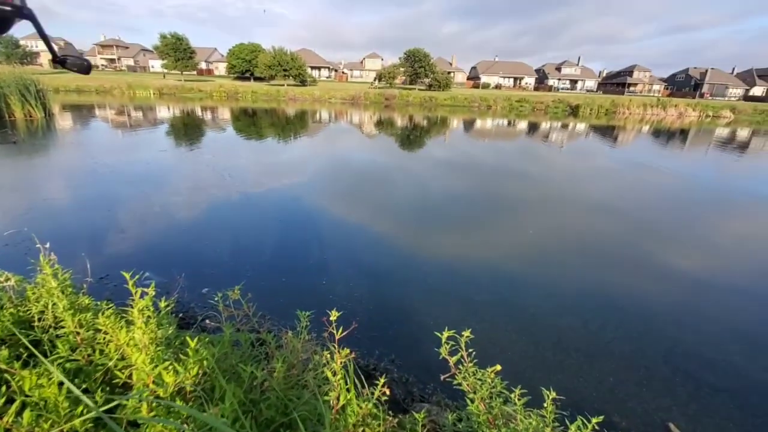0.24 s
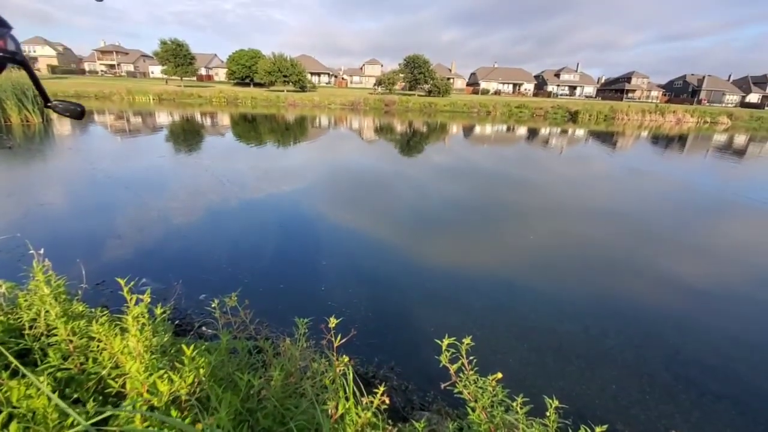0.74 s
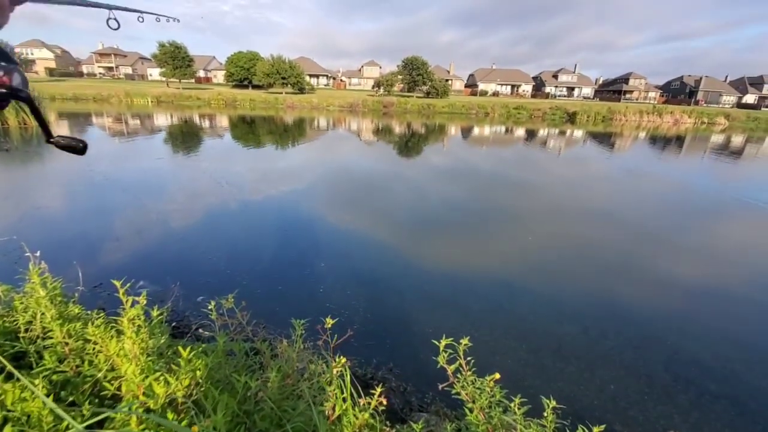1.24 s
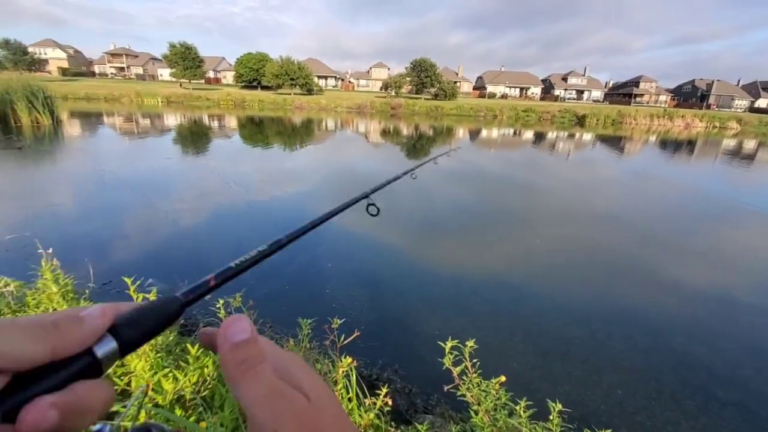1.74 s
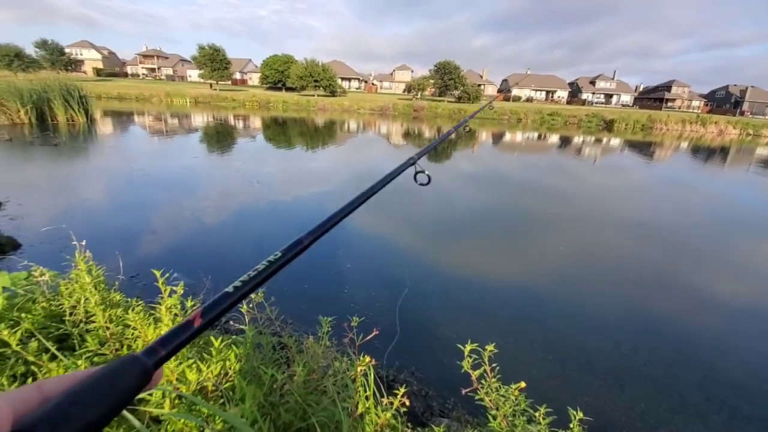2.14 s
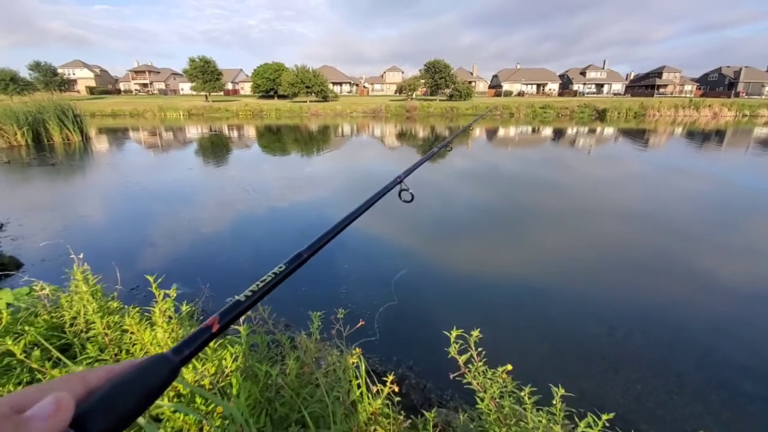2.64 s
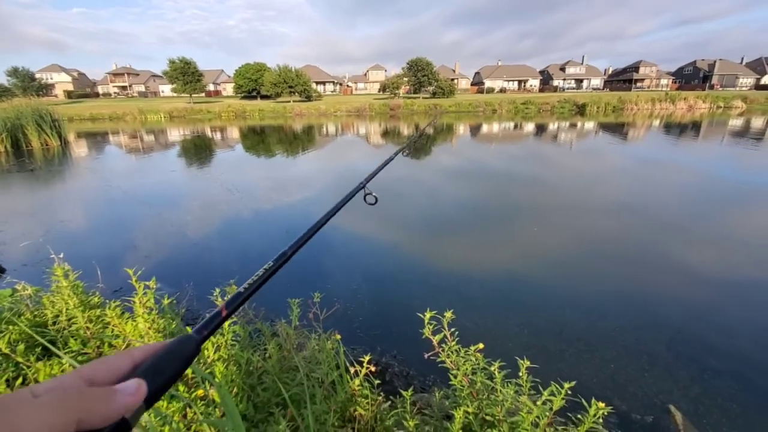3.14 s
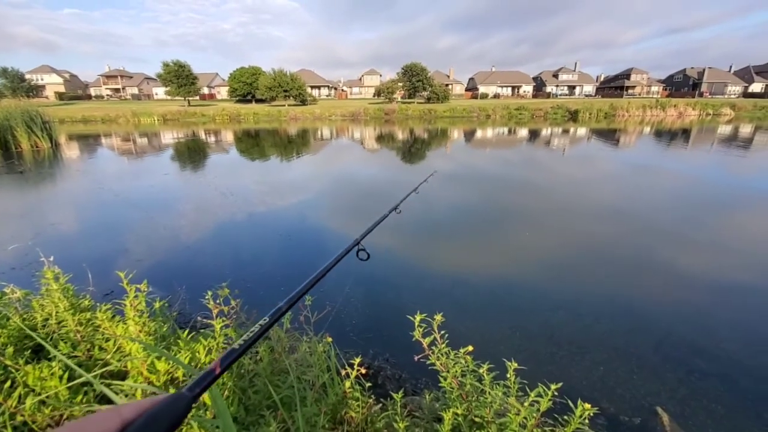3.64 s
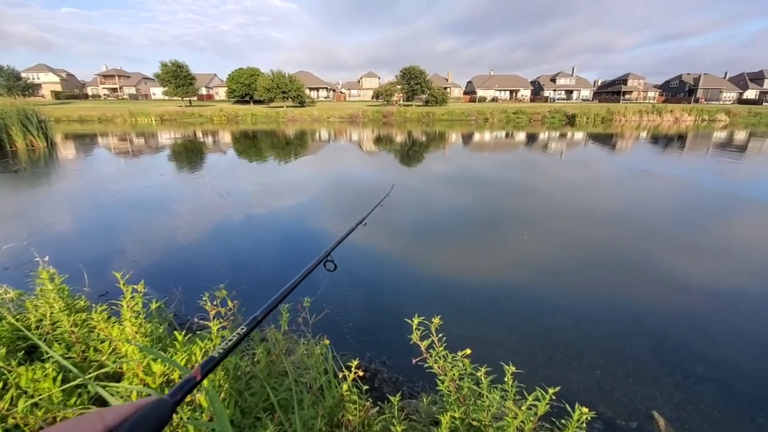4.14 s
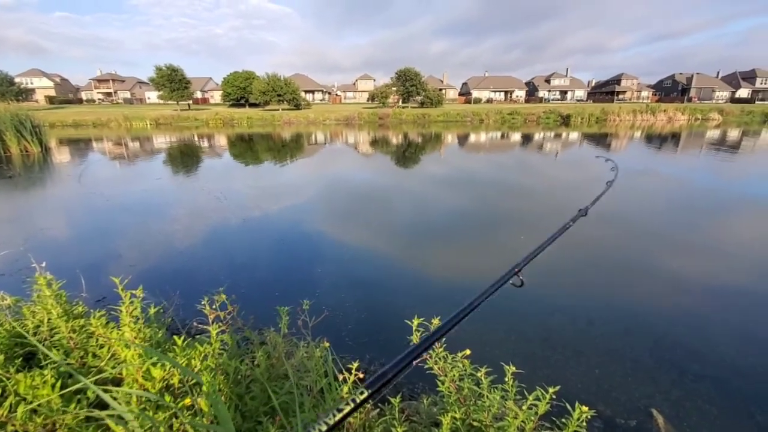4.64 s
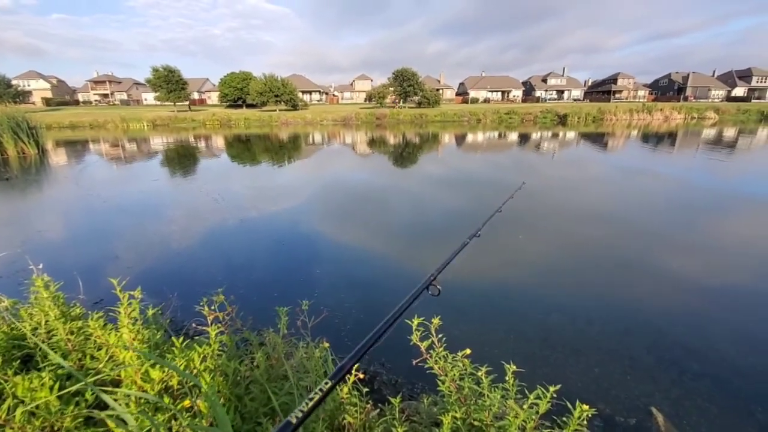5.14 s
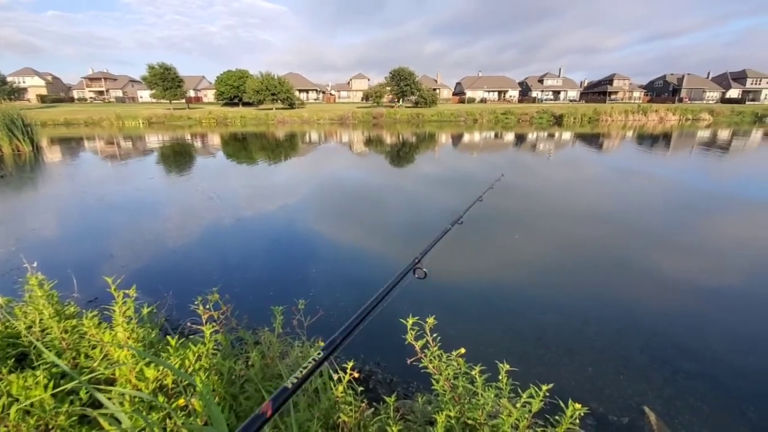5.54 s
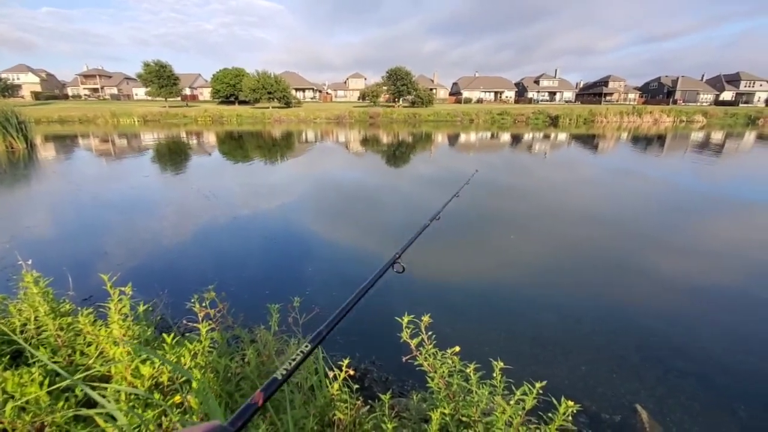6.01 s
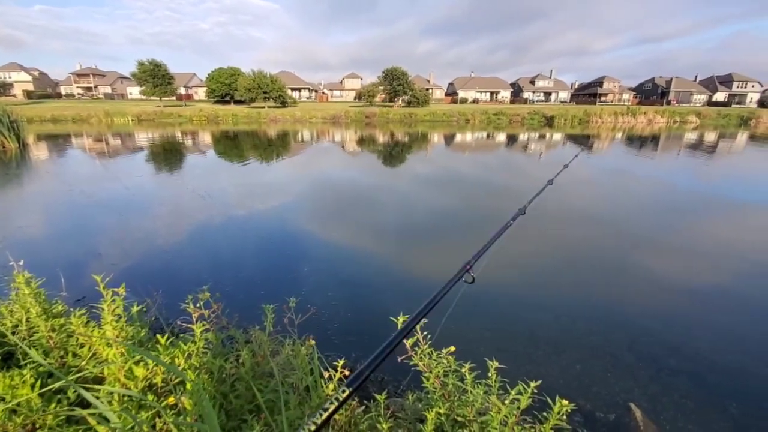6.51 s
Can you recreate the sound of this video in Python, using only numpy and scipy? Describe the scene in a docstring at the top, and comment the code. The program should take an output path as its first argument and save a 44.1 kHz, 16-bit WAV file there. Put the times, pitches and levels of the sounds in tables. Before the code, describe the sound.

A quiet pond bank in open air, heard through a close stereo microphone with faint steady hiss. Crickets shimmer continuously around 6 kHz, slightly stronger at first, over low distant road rumble; a far engine swells gently around 1.5 s. A small far bird sings thin, gliding whistles near 4 kHz, in short phrases starting around 0, 0.9, 2, 2.8, 3.7, 4.7, 5.5 and 6.3 s, fainter toward the end. Tiny reel rattles and a light tick at 1.5 s precede one loud, dry metallic snap at 2.04 s, with a woody-hard knock and very brief wire chatter. The whole background then dips and slowly creeps back. Soft low breeze buffets at 2.2-3 s. Fine bright clicks come at 2.75 and 2.93 s. From 3 s, soft rubbing and a grainy reel whirr, strongest near 3.5 s, continue faintly with small knocks, clearest at 4.85 s, until the end at 6.8 s.

```python
"""A pond bank on a nearly still day: crickets trill in the weeds, a small bird whistles far off, traffic rumbles.
Close by, an angler handles a spinning reel: one sharp snap, a few light clicks, then a soft whirr of winding.
Crickets and bird are gliding tones; traffic, breeze, hiss, whirr and rubbing are shaped noise, engines wavering sines.
Metal contacts are decaying noise bursts with a resonant peak, and knocks are damped modes of the reel body.
Loud peaks make an automatic gain control turn the whole scene down for a while."""
import sys
import numpy as np
from scipy import signal
from scipy.fft import rfft, irfft, next_fast_len
from scipy.io import wavfile
from scipy.ndimage import uniform_filter1d, map_coordinates

SR = 44100
rng = np.random.default_rng(int(sys.argv[2]) if len(sys.argv) > 2 else 0)


def persist_wave(psi):
    """Save psi, clipped to +-1, as 16-bit WAV."""
    counts = np.round(np.clip(psi, -1, 1) * 32767).astype(np.int16)
    wavfile.write(sys.argv[1], SR, np.atleast_2d(counts).T)


N = 298680
TIME = np.arange(N) / SR

# hiss spectrum: pitch_hz, density_db (relative, per Hz)
HISS_SPECTRUM = [(500, 13), (1100, 17.5), (1500, 19), (2000, 19), (2500, 21.5), (3100, 15.5), (4500, 3),
                 (7400, 11), (8600, -1.5), (9800, 6.5), (12000, -4.5), (14200, -8), (16000, -9)]
# left-right likeness of the hiss: pitch_hz, coherence
HISS_COHERENCE = [(1500, 1.0), (3000, 1.0), (5000, 0.7), (8500, 0.4), (12000, 0.13)]
HISS_DB = -51

# puffs of breeze on the microphone ports, before buffeting: peak_s, length_s, level_db
BREEZE_PUFFS = [(2.25, 0.44, -42.5), (2.72, 0.97, -44.5), (4.7, 0.99, -53)]
# breeze spectrum: pitch_hz, density_db (relative, per Hz)
BREEZE_SPECTRUM = [(15, -22), (40, -4.5), (75, -6.5), (130, -14), (300, -47), (900, -90)]
BREEZE_REST_DB = -65.5

# far roads over time: time_s, rumble_db, wash_db (before a fixed lift and drift)
TRAFFIC_LEVELS = [(0, -45, -53), (.7, -43.5, -54.5), (1.6, -43.5, -54), (2.6, -45, -53), (3.4, -45, -53),
                  (4.4, -44.5, -53.5), (5.4, -45, -52), (6.77, -44.5, -54.5)]
# steady engine notes: pitch_hz, level_db (relative; lowered together)
ENGINE_DRONES = [(75, -51.5), (141, -54.5), (391, -68)]
# one far engine swelling past: peak_s, length_s, level_db
ENGINE_SWELL = [(1.55, 1.7, -49)]
ENGINE_IDLE_HZ, ENGINE_RISE_HZ, ENGINE_REV_S, ENGINE_IDLE_DB = 141.6, 33.9, 2.7, -60
# road rumble spectrum: pitch_hz, density_db (relative, per Hz)
RUMBLE_SPECTRUM = [(15, -5), (28, -16), (42, -5), (75, 1.5), (120, -0.5), (170, -1.5), (250, -9.5),
                   (400, -36), (900, -60)]
# tyre wash spectrum: pitch_hz, density_db (relative, per Hz)
WASH_SPECTRUM = [(120, -1.5), (280, 2), (420, 2), (700, -2), (1100, -9), (1500, -6.5), (2500, -32),
                 (4000, -18.5), (8000, -43)]
# left-right likeness of far sound: pitch_hz, coherence
FAR_COHERENCE = [(40, 0.91), (130, 0.89), (260, 0.91), (480, 0.65), (750, 0.19), (1200, 0.42), (15000, 1)]

# singing levels of the cricket groups: time_s, high_pitched_db, low_pitched_db
SWARM_LEVELS = [(0, -44, -51), (.8, -43, -51.5), (1.6, -48, -49), (2.3, -48, -56), (3.1, -50, -51),
                (3.85, -47, -50.5), (4.3, -48.5, -49), (5.2, -49.5, -46.5), (6.77, -50.5, -47)]
# near crickets: carrier_hz, stroke_rate_hz, level_db (relative to their group), balance_db (left minus right)
NEAR_CRICKETS = [(6510, 51.8, -1.2, -2.5), (6270, 53, -3.5, -5), (6420, 83.5, -11, -3)]
# distant chorus and its octave: pitch_hz, density_db (relative, per Hz)
CHORUS_SPECTRUM = [(4800, -76), (5550, -19), (5950, -11.5), (6200, 0), (6580, 4.5), (6800, -3), (7000, -40),
                   (7800, -80), (11500, -26.5), (12300, -23), (12850, -13), (13350, -20.5), (13900, -24),
                   (15000, -56)]

# bird's notes, in phrases drawn from chip, rising whistle, arch and falling close:
# peak_s, rise_s, fall_s, start_hz, peak_hz, end_hz, level_db (relative)
BIRD_NOTES = [(.063, .018, .032, 4250, 4600, 4200, -53), (.205, .115, .04, 4090, 4320, 4260, -56),
              (.282, .03, .045, 4270, 4650, 4220, -52), (.33, .02, .05, 4190, 4130, 3980, -55),
              (.395, .035, .07, 3990, 3890, 3730, -55), (.9, .015, .036, 4350, 4700, 4120, -46),
              (1.035, .09, .035, 4120, 4290, 4120, -51.5), (1.112, .04, .062, 4030, 4490, 4080, -53.5),
              (1.245, .055, .065, 4030, 3870, 3740, -53.5), (1.982, .016, .03, 4350, 4640, 4250, -56),
              (2.17, .09, .02, 4170, 4280, 4260, -63), (2.217, .035, .05, 4300, 4460, 4170, -53),
              (2.285, .035, .07, 4140, 4030, 3810, -55.5), (2.808, .014, .034, 4400, 4570, 4150, -49),
              (2.96, .09, .04, 4080, 4190, 4130, -59), (3.035, .022, .03, 4280, 4420, 4200, -50.5),
              (3.095, .05, .055, 4170, 4090, 3850, -53), (3.745, .017, .034, 4280, 4480, 3980, -49.5),
              (3.91, .105, .035, 4000, 4140, 4140, -53.5), (3.98, .032, .03, 3980, 4380, 4300, -57),
              (4.022, .022, .042, 4310, 4180, 3970, -52), (4.656, .017, .036, 4280, 4610, 3980, -46.5),
              (4.803, .105, .035, 4020, 4260, 4080, -52), (4.878, .03, .048, 4220, 4420, 4220, -49.5),
              (5.503, .016, .036, 4280, 4440, 3980, -57), (5.62, .07, .03, 4040, 4090, 4080, -63),
              (5.704, .018, .032, 4280, 4400, 4170, -60), (5.75, .02, .06, 4220, 4180, 4020, -63),
              (6.318, .018, .034, 4250, 4440, 4080, -60), (6.49, .015, .04, 4420, 4520, 4250, -60.5),
              (6.565, .045, .09, 4260, 4130, 4020, -60)]
BIRD_TRIM_DB, BIRD_ECHO_DB = -1, -12
# share of a note over which its pitch turn is rounded; flutter of level and of pitch
NOTE_ROUNDING, FLUTTER_DB, FLUTTER_HZ = .25, 2.2, 22

# strokes of hand and line on the rod: peak_s, length_s, level_db
ROD_STROKES = [(1.45, 1.1, -74), (2.66, 0.43, -66.5), (2.88, 0.098, -68), (3.5, 1.5, -61),
               (4.4, 0.7, -61.5), (6.5, 1.7, -66)]
# rubbing spectrum: pitch_hz, density_db (relative, per Hz)
RUBBING_SPECTRUM = [(800, -16), (2000, -9), (4000, 5.0), (7000, 0), (10000, 1.5), (15000, -6.0)]

# turns of the reel handle: peak_s, length_s, level_db
HANDLE_TURNS = [(3.05, .5, -54.5), (3.5, 0.71, -47), (3.8, 0.59, -50.5), (4.5, 0.33, -55), (5.3, 2.7, -59),
                (6.1, 0.94, -54.5), (6.7, 0.29, -57)]
# gear whirr spectrum: pitch_hz, density_db (relative, per Hz)
WHIRR_SPECTRUM = [(600, -12.5), (1300, -8), (1750, -3.5), (2030, 6.5), (2250, -5), (3000, -24), (6000, -47)]
WINDING_REST_DB = -63.5

# sprung wire rattling after it snaps shut: peak_s, length_s, level_db
WIRE_CHATTER = [(2.05, 0.014, -27.5), (2.061, 0.034, -35)]
# wire chatter spectrum: pitch_hz, density_db (relative, per Hz)
CHATTER_SPECTRUM = [(300, -14), (480, 8.5), (620, -1), (850, 6.5), (1050, 4), (1280, 7), (1800, 4),
                    (2300, -14), (3000, -7), (5500, -12), (7000, -18), (8200, -20), (9800, -6),
                    (11300, -13), (15500, -17)]

# metal parts of the reel catching and seating; levels precede the spectral shaping:
# start_s, tick_db, tick_hz, tick_t60_s, knock_db, body_hz, balance_db (left minus right)
METAL_CONTACTS = [(1.457, -42, 3700, 0.0082, -42, 1800, 7), (2.0276, -36, 10000, .01, -35, 1800, -10),
                  (2.0308, -19.5, 11100, 0.0041, -46, 1800, 1), (2.031, -35, 4800, .012, -47, 1800, -8),
                  (2.034, -48, 4900, .008, -27, 1850, -4), (2.041, -29, 11300, .012, -43, 1800, -4),
                  (2.0431, -28, 11000, 0.011, -26, 1690, 6), (2.0442, -22, 10400, .006, -2, 1824, -4.5),
                  (2.0491, -33, 6500, 0.011, -23, 1167, -4), (2.051, -37, 9800, .012, -24, 1860, 4),
                  (2.0555, -42, 9800, .01, -23, 1930, -5), (2.077, -36, 5500, .005, -54, 1800, -3),
                  (2.7282, -37, 5400, 0.012, -47, 1790, -6), (2.7305, -49, 5400, .012, -41, 1820, -5),
                  (2.737, -26.5, 6740, 0.008, -40, 1780, -9), (2.7396, -35.5, 7500, 0.013, -39, 1740, 1),
                  (2.743, -47, 4000, 0.012, -39, 1730, 2), (2.75, -40, 10500, .012, -46, 1750, -6),
                  (2.7512, -29, 5360, 0.0087, -31, 1740, -2), (2.7533, -37, 8500, 0.0099, -46, 1700, -2),
                  (2.7768, -39.5, 3700, 0.0067, -48, 1800, -2), (2.9318, -36.5, 5440, 0.014, -48, 1800, -3),
                  (2.9346, -36, 6460, .007, -46, 1780, -9), (2.94, -36, 4700, 0.0088, -28, 1950, -6),
                  (4.4588, -50, 11000, 0.0092, -34.5, 1800, 0)]
# play in the handle knocking the body alone: start_s, knock_db (before spectral balance)
HANDLE_KNOCKS = [(0.34, -38.5), (1.038, -39), (1.6486, -33.5), (1.7355, -37), (3.456, -35), (3.956, -33.5),
                 (4.844, -27.5), (5.747, -32.5), (6.322, -33.5)]
# modes of reel body and rod at the main strike place: pitch_hz, level_db (relative), t60_s
BODY_MODES = [(1871, 11, 0.0071), (2120, -21, 0.0038), (1673, -5, 0.0088), (1320, -20.5, 0.021),
              (854, -26.5, 0.029), (466, -36.5, 0.03)]
# frequency balance of the knocks, deep part right and high part left: pitch_hz, balance_db (left minus right)
KNOCK_BALANCE = [(450, -15), (1300, 3), (1750, -3), (2150, 13), (3000, 1)]
# filter on the metal ticks: pitch_hz, gain_db
TICK_RESPONSE = [(300, -8), (900, 16), (1700, 14), (3000, 3), (5000, 1), (6800, 2), (8200, -6),
                 (10500, -3.5), (13000, 4), (16000, 2)]
# filter on the knocks' return from the bank: pitch_hz, gain_db
BANK_RESPONSE = [(350, 1), (850, -16), (1300, -4.5), (1900, -21.5), (2600, 9.5)]
# lowest level of the random rattles and the range above it
RATTLE_DB, RATTLE_RANGE_DB = -46, 7
# low-pass corner of the body; rise, sharpness and gain of the struck part's ring
BODY_TOP_HZ, TICK_RISE_S, PART_Q, PART_GAIN = 2220, 0.0013, 4.9, 9.5

# gain control: threshold, dB cut per dB above it, recovery rate, reaction time
AGC_DB, AGC_SLOPE, AGC_DB_PER_S, AGC_LAG_S = -13, 0.19, 4.5, 0.048
TOP_HZ = 15800  # band limit of the output


def amp(db):
    """Logarithmic level: 20 dB is a tenfold change of amplitude."""
    return 10 ** (np.asarray(db) / 20)


def unit(x):
    """Normalisation: root-mean-square amplitude becomes 1."""
    return x / np.sqrt(np.mean(x ** 2) + 1e-20)


def along(points, hz):
    """Interpolation of (Hz, value) points along a logarithmic frequency axis."""
    f, v = np.transpose(points)
    return np.interp(np.log(hz + 1), np.log(f + 1), v)


def curves(rows):
    """Linear interpolation in time of each column after the first."""
    s, *cols = np.transpose(rows)
    return [np.interp(TIME, s, c) for c in cols]


def wobble(rate):
    """Slow random modulation: a smooth curve through rate random knots a second."""
    knots = rng.standard_normal(int(N * rate / SR) + 4)
    return map_coordinates(knots, [TIME * rate])


def turns(hz):
    """Phase is the time integral of frequency."""
    return 2 * np.pi * np.cumsum(hz) / SR


def filtered(x, response):
    """Linear filtering: the spectrum is multiplied by a frequency response."""
    size = next_fast_len(N + SR // 2)
    spectrum = rfft(x, size) * response(np.fft.rfftfreq(size, 1 / SR))
    return irfft(spectrum, size)[..., :N]


def panned(pan_db):
    """Interaural level difference: left and right gains share pan_db between them."""
    return amp([[pan_db / 2], [-pan_db / 2]])


def spaced(x, lead_ms):
    """Interaural time difference: sound reaches the left microphone lead_ms before the right."""
    sides = np.array([[1], [-1]])
    return filtered(x, lambda hz: np.exp(np.pi * 1j * hz * lead_ms / 10 ** 3 * sides))


def add(track, s, sound):
    """Superposition: a sound is summed into a track at time s."""
    part = track[..., max(round(s * SR), 0):][..., :sound.shape[-1]]
    part += sound[..., :part.shape[-1]]


def swells(rows, rest_db=-120):
    """Power addition: cosine arches (peak s, length s, dB) over a resting level, returned as gain."""
    power = amp(rest_db) ** 2
    for s, length, db in rows:
        arch = np.cos(np.pi * np.clip((TIME - s) / length, -.5, .5))
        power = power + (amp(db) * arch) ** 2
    return np.sqrt(power)


def rush(spectrum, alike):
    """Partial coherence: independent mid and side noise mix to a set left-right likeness, rms 1."""
    def response(hz):
        angle = np.arccos(np.clip(along(alike, hz), -1, 1)) / 2
        return amp(along(spectrum, hz)) * [np.cos(angle), np.sin(angle)]
    mid, side = filtered(rng.standard_normal((2, N)), response)
    return unit(np.array([mid + side, mid - side]))


def scatter(x, t60):
    """Diffuse reflection: weeds and bank return a delayed, decaying tail, different on each side."""
    t = np.arange(SR // 3) / SR
    tail = rng.standard_normal((2, len(t))) * amp(-60 * t / t60) * (t > .004)
    tail /= np.linalg.norm(tail, axis=1, keepdims=True)
    return signal.fftconvolve(np.atleast_2d(x), tail, axes=1)[:, :N]


def air():
    """Stationary noise: a faint even hiss, reaching the left microphone first."""
    return amp(HISS_DB) * spaced(rush(HISS_SPECTRUM, HISS_COHERENCE), lead_ms=0.5017)


def breeze():
    """Turbulence at the ports: soft low buffeting, nearly unrelated between the two sides."""
    buffeting = amp(1.4 * wobble(11.0)) * panned(-8) * rush(BREEZE_SPECTRUM, [(50, 0.27)])
    return swells(BREEZE_PUFFS, BREEZE_REST_DB) * buffeting


def engine_note(hz):
    """Frequency and amplitude modulation: a far engine's sine wavers a little, at rms 1."""
    tone = np.sin(turns(hz + 1.5 * wobble(8)))
    return unit(amp(1.5 * wobble(5)) * tone)


def traffic():
    """Summed far sources: road rumble, tyre wash, steady engines and one that speeds up and eases off."""
    rumble_db, wash_db = curves(TRAFFIC_LEVELS)
    # the passing engine is loudest at its highest pitch
    peak_s = ENGINE_SWELL[0][0]
    pitch_hz = ENGINE_IDLE_HZ + ENGINE_RISE_HZ * swells([(peak_s, ENGINE_REV_S, 0)]) ** 2
    engines = swells(ENGINE_SWELL, ENGINE_IDLE_DB) * engine_note(pitch_hz)
    for hz, db in ENGINE_DRONES:
        engines = engines + amp(db - 3.5) * engine_note(hz)
    drift_db = .5 * wobble(5)
    wash = amp(wash_db + 3.0 + drift_db) * spaced(rush(WASH_SPECTRUM, FAR_COHERENCE), lead_ms=0.17)
    rumble = amp(rumble_db) * rush(RUMBLE_SPECTRUM, FAR_COHERENCE)
    return rumble + wash + engines


def trill(carrier_hz, rate, sag_hz, blur_hz, gap_level, octave_db):
    """Stridulation: each wing stroke swells and drops ever faster in pitch, with a faint octave."""
    stroke = (turns(rate + 0.27 * wobble(1.7)) / (2 * np.pi) + rng.random()) % 1
    pressure = gap_level + np.sin(np.pi * stroke) ** 2
    slowing = stroke ** 3 - .16
    tone = np.exp(1j * turns(carrier_hz - sag_hz * slowing + 25 * wobble(60)))
    # the weeds blur the tone differently for each microphone
    paths = 2.1 + np.array([wobble(blur_hz) + 1j * wobble(blur_hz) for _ in range(2)])
    blur = paths / (1 + np.abs(paths)) ** .6
    return unit(pressure * np.real(blur * (tone + amp(octave_db) * tone ** 2)))


def crickets():
    """Many incoherent singers merge into noise; a few near trills stand out, high and low swelling apart."""
    high_db, low_db = curves(SWARM_LEVELS)
    near = np.zeros((2, N))
    for hz, rate, db, pan in NEAR_CRICKETS:
        swell_db = high_db if hz > 6380 else low_db
        song = trill(hz, rate, sag_hz=617, blur_hz=170.5, gap_level=0.25, octave_db=-20.5)
        near += amp(swell_db + db) * panned(pan) * song
    far_db = (high_db + low_db) / 2 + 1.43
    far = amp(far_db) * panned(-6) * rush(CHORUS_SPECTRUM, [(6400, 0.0086)])
    return spaced(near, lead_ms=0.4956) + far


def whistle(rise_s, fall_s, start_hz, top_hz, end_hz):
    """Frequency glide: a pure tone swells as pitch nears a rounded turn, then fades as it moves away."""
    t = np.arange(-round(rise_s * SR), round(fall_s * SR)) / SR
    away = np.where(t < 0, -t / rise_s, t / fall_s)
    bend = np.hypot(away, NOTE_ROUNDING) - NOTE_ROUNDING
    pitch = top_hz + (np.where(t < 0, start_hz, end_hz) - top_hz) * bend / bend.max()
    flutter = np.interp(t, np.linspace(-.12, .12, 40), rng.standard_normal(size=40))
    pitch = pitch + FLUTTER_HZ * flutter
    loudness = np.sqrt(np.abs(np.cos(np.pi / 2 * away))) * (1 - .5 * away ** 2)
    return loudness * np.sin(turns(pitch))


def bird():
    """Direct and reflected sound: phrases of thin whistles, varied each time, echo faintly off the bank."""
    song = np.zeros(N)
    for s, rise_s, fall_s, start_hz, top_hz, end_hz, db in BIRD_NOTES:
        add(song, s - rise_s, amp(db) * whistle(rise_s, fall_s, start_hz, top_hz, end_hz))
    song = song * amp(BIRD_TRIM_DB + FLUTTER_DB * wobble(110))
    echo = amp(BIRD_ECHO_DB) * scatter(song, t60=.18)
    return panned(-3.9) * (spaced(song, lead_ms=0.44) + echo)


def rubbing():
    """Stick-slip friction: skin and line catch and slip on the rod in fine grains."""
    catches = amp(4 * wobble(180) + wobble(10))
    grains = catches * rush(RUBBING_SPECTRUM, [(4000, 0.17)])
    return swells(ROD_STROKES) * unit(grains)


def reel_whirr():
    """Resonant filtering of gear noise: turning teeth rustle finely through the body resonance."""
    teeth = rng.standard_normal(N) * amp(2 * wobble(200))
    gears = filtered(teeth, lambda hz: amp(along(WHIRR_SPECTRUM, hz)))
    return swells(HANDLE_TURNS, WINDING_REST_DB) * panned(0.74) * unit(spaced(gears, lead_ms=0.61))


def chatter():
    """Repeated impact: the sprung wire rattles densely and briefly as it settles."""
    contacts = amp(2 * wobble(700))
    rattle = contacts * rush(CHATTER_SPECTRUM, [(800, .6), (4000, .1)])
    return swells(WIRE_CHATTER) * unit(rattle)


def body_knock(pitch_hz):
    """Damped modes: the body swings up in about a millisecond, its pitch set by where it is struck."""
    t = np.arange(SR // 10) / SR
    scale = pitch_hz / BODY_MODES[0][0]
    ring = sum(amp(db - 60 * t / t60) * np.sin(2 * np.pi * hz * scale * t) for hz, db, t60 in BODY_MODES)
    ring = ring * (1 - np.exp(-(t / 0.0016) ** 3))
    ring = signal.sosfilt(signal.butter(6, BODY_TOP_HZ, fs=SR, output="sos"), ring)
    return ring / np.abs(ring).max()


def metal_tick(tick_hz, t60):
    """Impact excitation: a decaying noise burst makes the small struck part ring at its own pitch."""
    t = np.arange(SR // 10) / SR
    burst = rng.standard_normal((2, len(t))) * amp(-60 * t / t60) * (1 - np.exp(-t / TICK_RISE_S))
    part = signal.lfilter(*signal.iirpeak(tick_hz, PART_Q, SR), burst)
    return burst + PART_GAIN * part


def reel_clicks():
    """Coupled impact: metal contacts tick brightly and knock the body; the loose handle only knocks."""
    ticks, knocks = np.zeros((2, N)), np.zeros((2, N))
    body_hz = BODY_MODES[0][0]
    # tiny rattles of the reel at random moments
    for moment, size, place in rng.random(size=(45, 3)):
        rattle = body_knock(body_hz * (1 + 0.41 * (place - .5)))
        add(knocks, moment * N / SR, amp(RATTLE_DB + RATTLE_RANGE_DB * size) * rattle)
    for s, knock_db in HANDLE_KNOCKS:
        add(knocks, s, amp(knock_db) * body_knock(body_hz))
    for s, tick_db, tick_hz, tick_t60, knock_db, struck_hz, pan in METAL_CONTACTS:
        add(knocks, s, amp(knock_db) * panned(pan) * body_knock(struck_hz))
        add(ticks, s, amp(tick_db) * panned(pan) * metal_tick(tick_hz, tick_t60))
    ticks = filtered(ticks, lambda hz: amp(along(TICK_RESPONSE, hz)))
    halves = np.array([[.5], [-.5]])
    knocks = filtered(spaced(knocks, lead_ms=-0.11), lambda hz: amp(along(KNOCK_BALANCE, hz) * halves))
    # the bank returns knocks and ticks with separate tails
    echo = filtered(scatter(knocks, t60=.054), lambda hz: amp(along(BANK_RESPONSE, hz)))
    sparkle = amp(-13) * scatter(ticks, t60=.06)
    return knocks + ticks + echo + sparkle


def scene():
    """Superposition: the pond's surroundings and the reel close by."""
    surroundings = air() + breeze() + traffic() + crickets() + bird()
    reel = rubbing() + reel_whirr() + chatter() + reel_clicks()
    return surroundings + reel


def gain_control(x):
    """Dynamic compression: a loud peak turns the gain down a moment later; it then creeps back."""
    over_db = np.maximum(20 * np.log10(np.abs(x).max(axis=0) + 1e-9) - AGC_DB, 0)
    # a running maximum on a rising ramp holds each cut and lets it recover steadily
    recovery_db = AGC_DB_PER_S * TIME
    cut_db = np.maximum.accumulate(AGC_SLOPE * over_db + recovery_db) - recovery_db
    smooth_db = uniform_filter1d(cut_db, size=512)
    return x * amp(-np.interp(TIME - AGC_LAG_S, TIME, smooth_db))


def record(dry):
    """Compression and band limiting: loud peaks lower the gain, and nothing passes above TOP_HZ."""
    return filtered(gain_control(dry), lambda hz: hz < TOP_HZ)


dry = scene()
out = record(dry)
persist_wave(out)
```